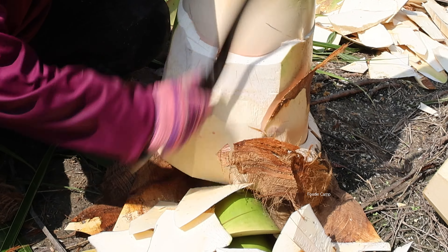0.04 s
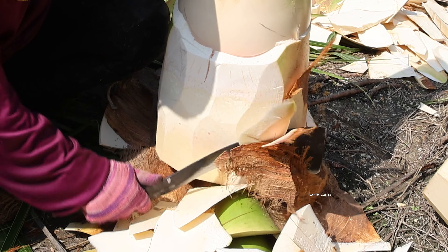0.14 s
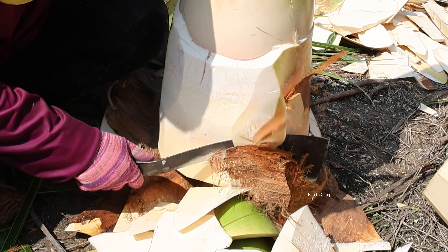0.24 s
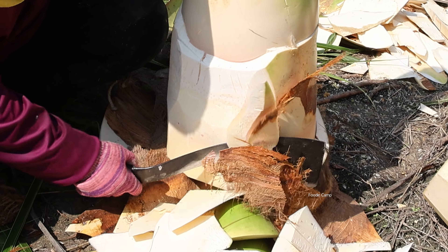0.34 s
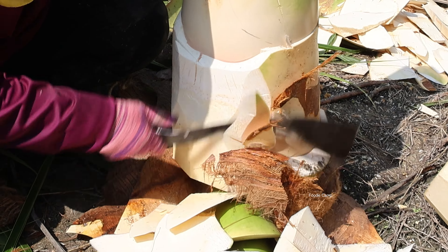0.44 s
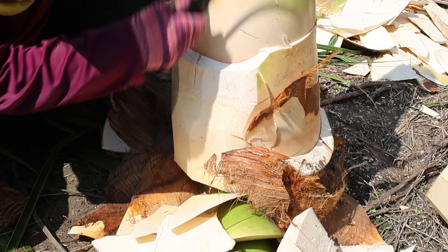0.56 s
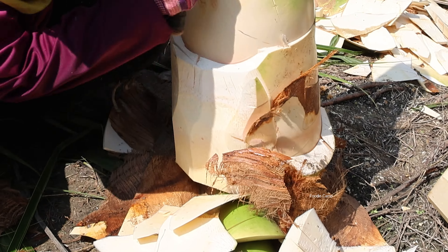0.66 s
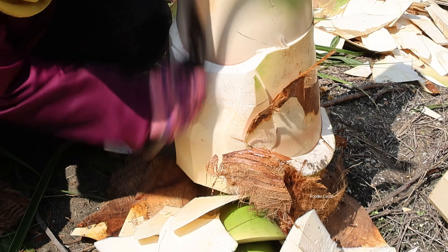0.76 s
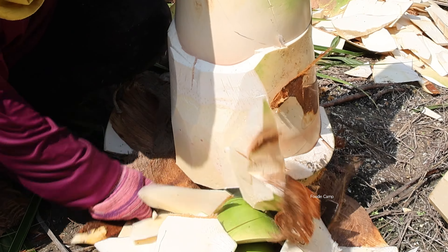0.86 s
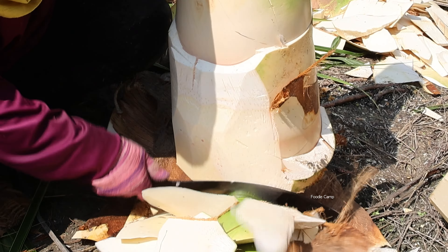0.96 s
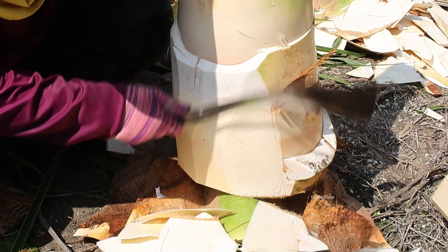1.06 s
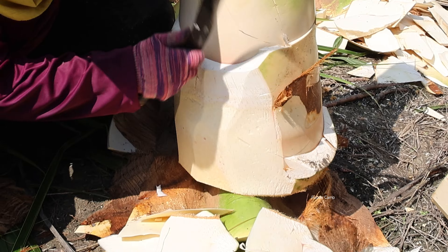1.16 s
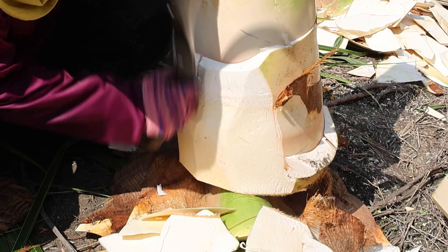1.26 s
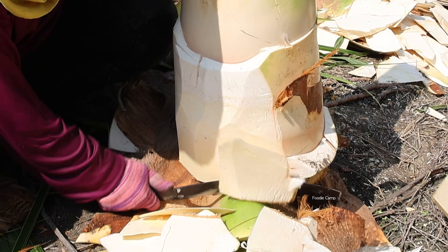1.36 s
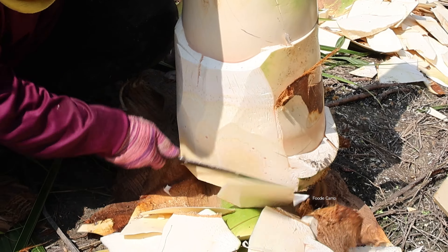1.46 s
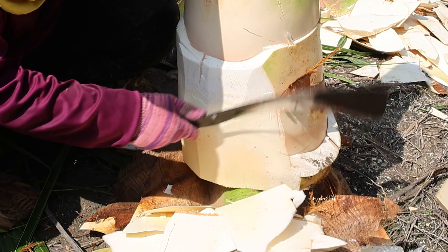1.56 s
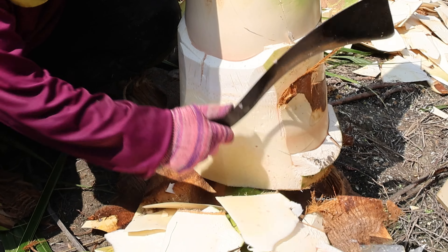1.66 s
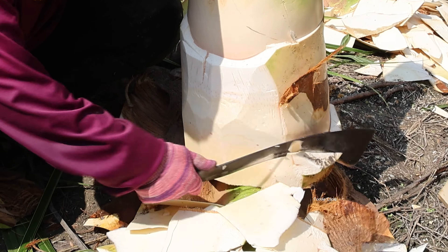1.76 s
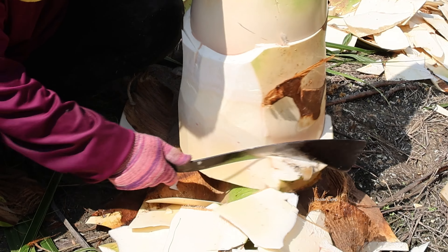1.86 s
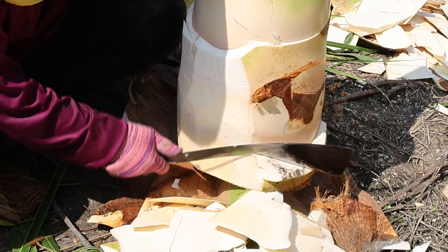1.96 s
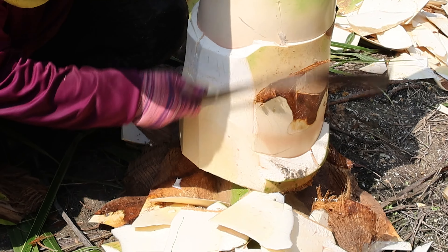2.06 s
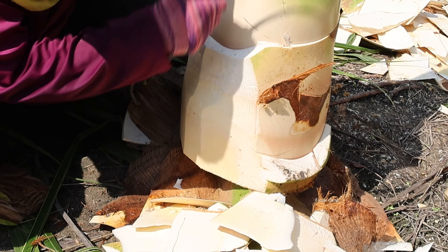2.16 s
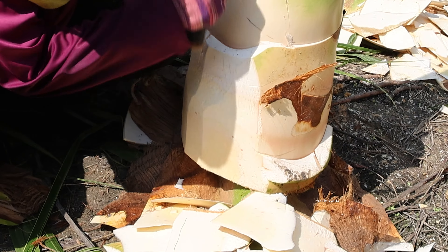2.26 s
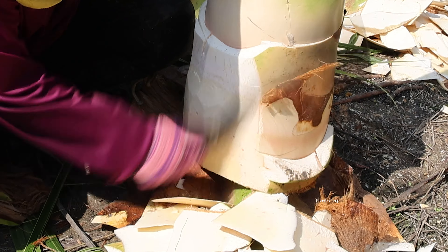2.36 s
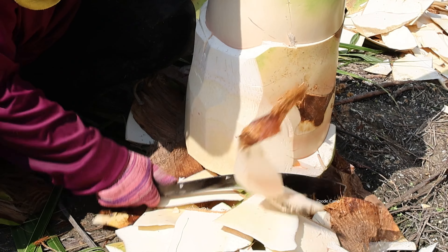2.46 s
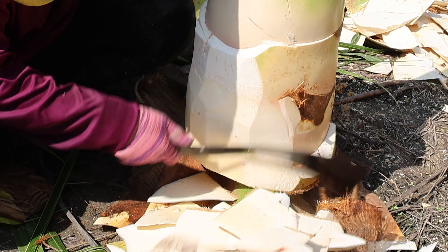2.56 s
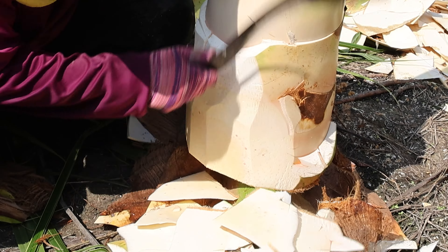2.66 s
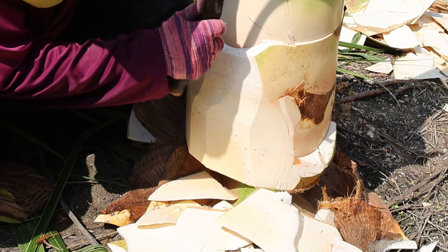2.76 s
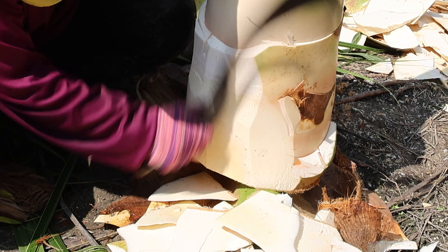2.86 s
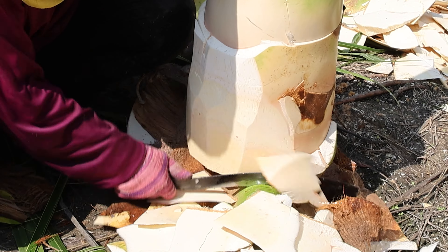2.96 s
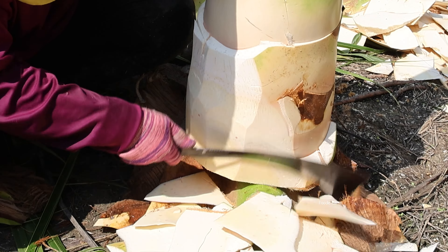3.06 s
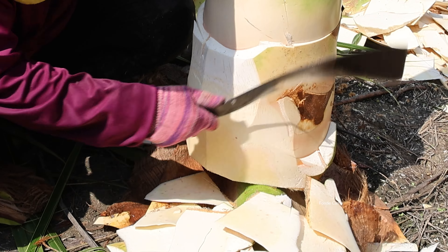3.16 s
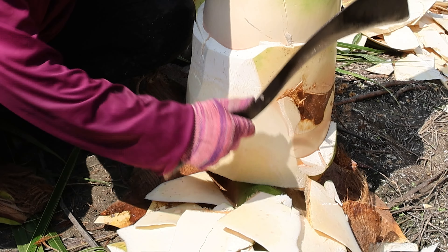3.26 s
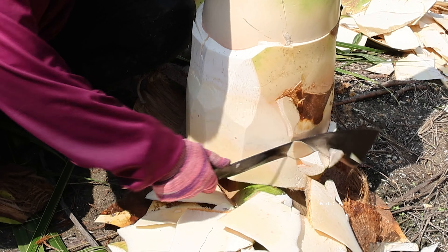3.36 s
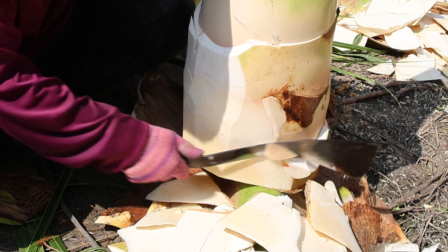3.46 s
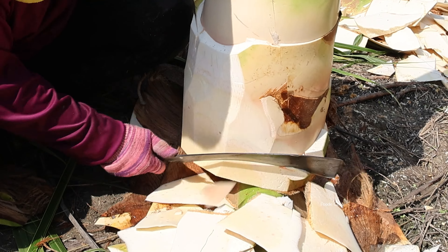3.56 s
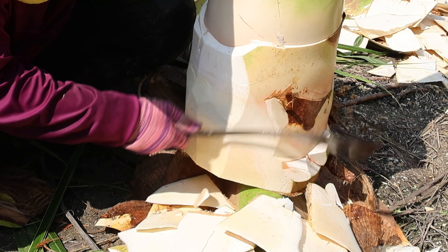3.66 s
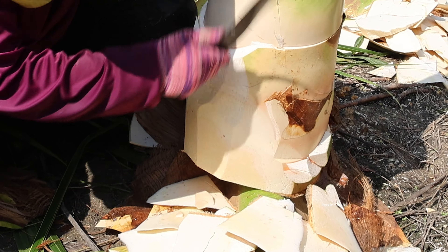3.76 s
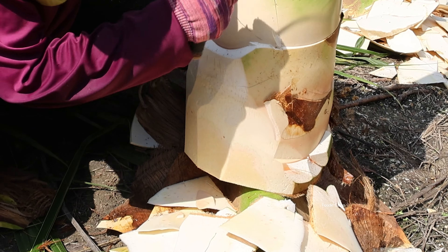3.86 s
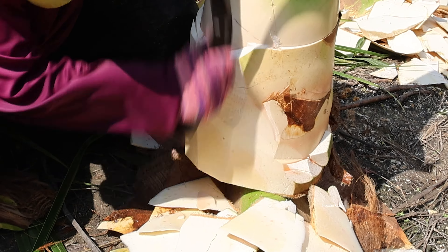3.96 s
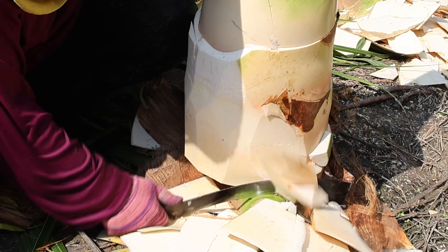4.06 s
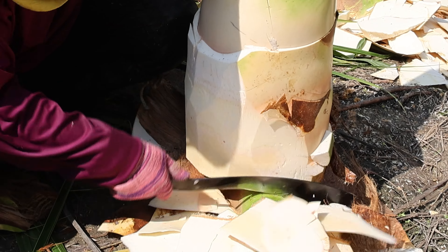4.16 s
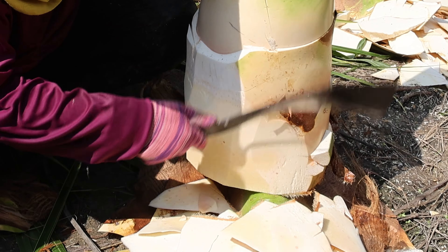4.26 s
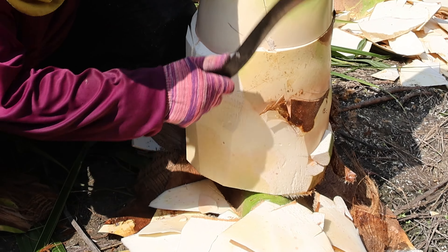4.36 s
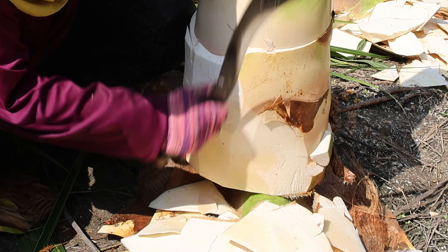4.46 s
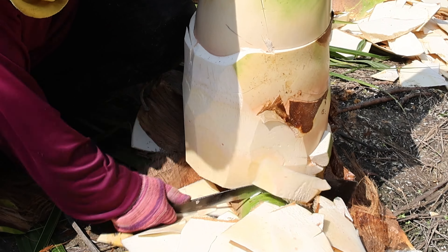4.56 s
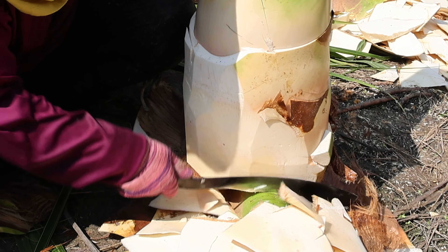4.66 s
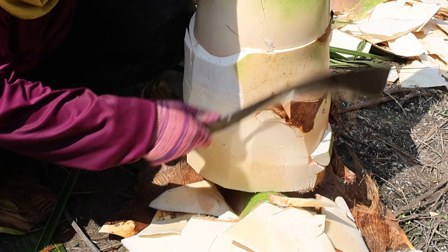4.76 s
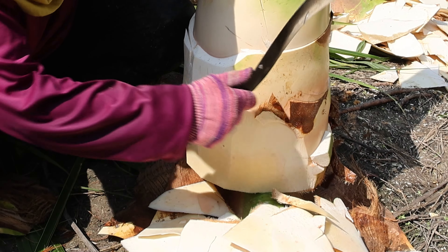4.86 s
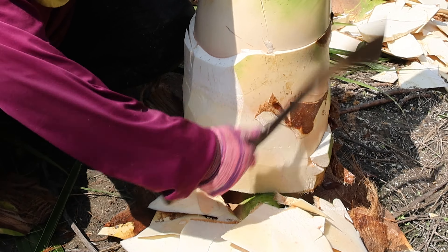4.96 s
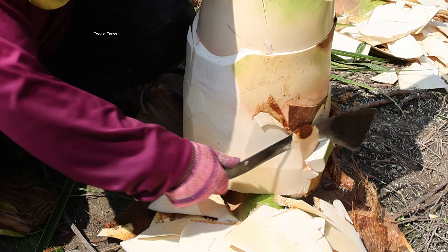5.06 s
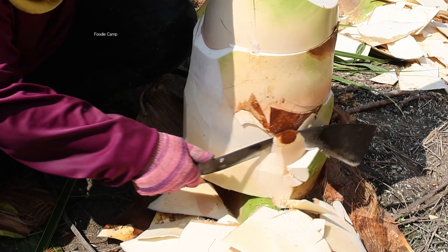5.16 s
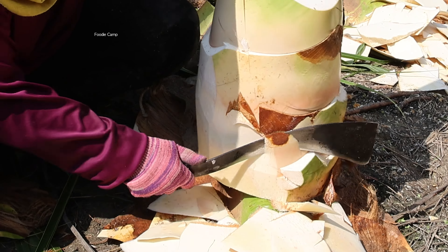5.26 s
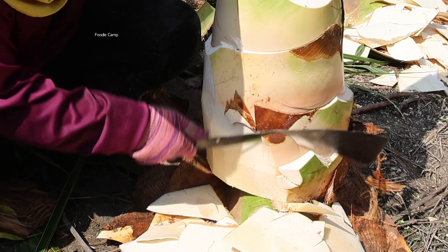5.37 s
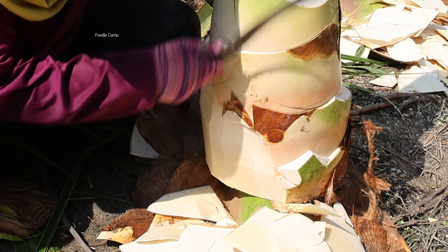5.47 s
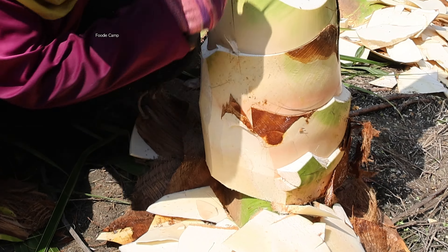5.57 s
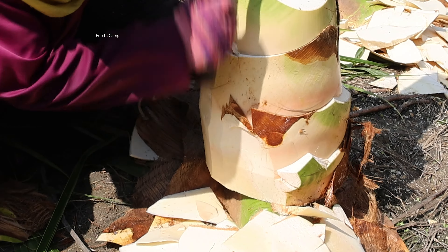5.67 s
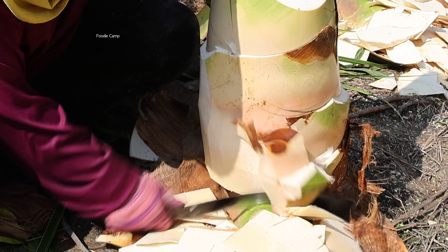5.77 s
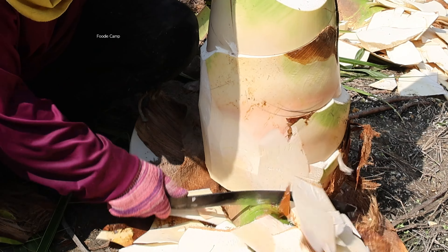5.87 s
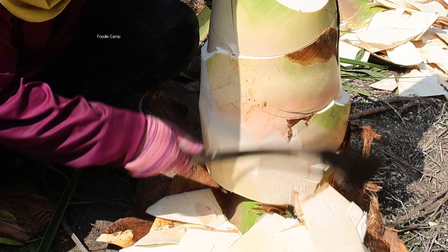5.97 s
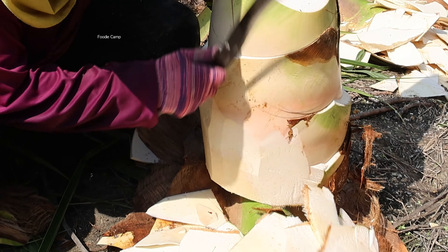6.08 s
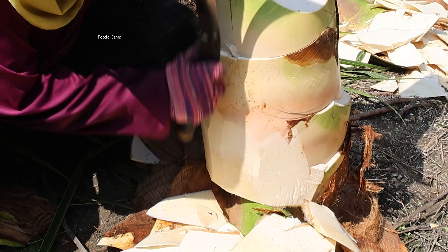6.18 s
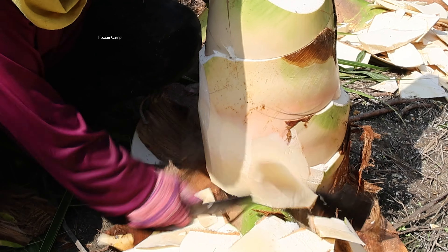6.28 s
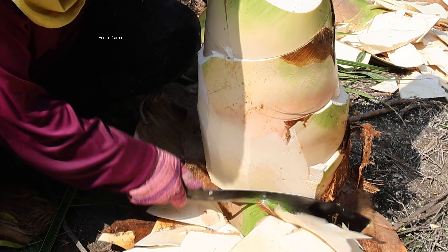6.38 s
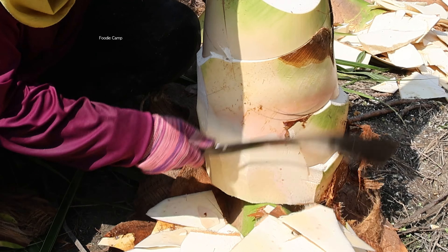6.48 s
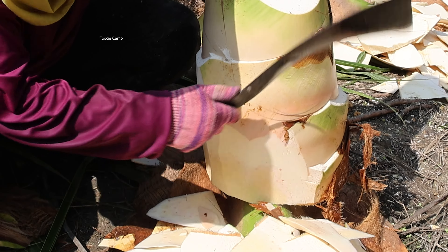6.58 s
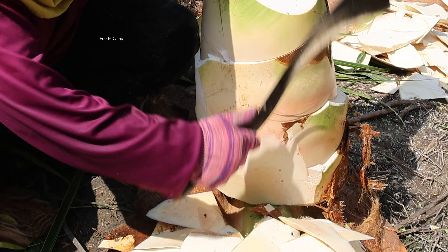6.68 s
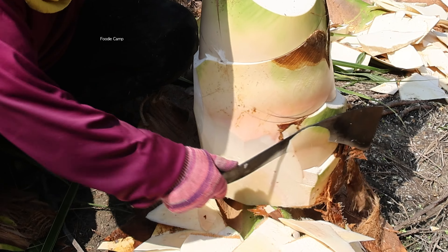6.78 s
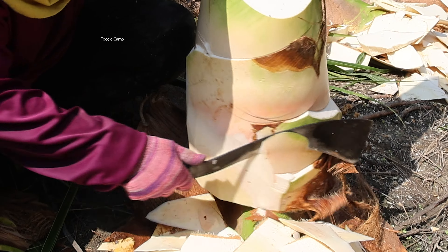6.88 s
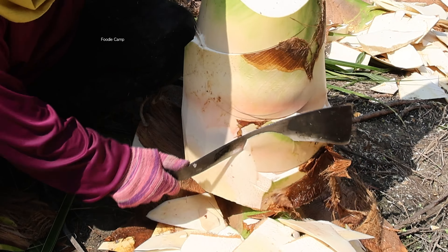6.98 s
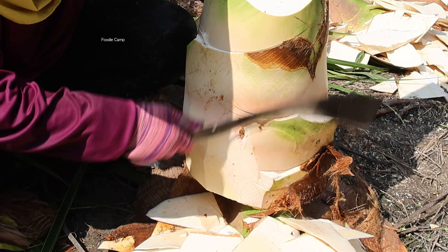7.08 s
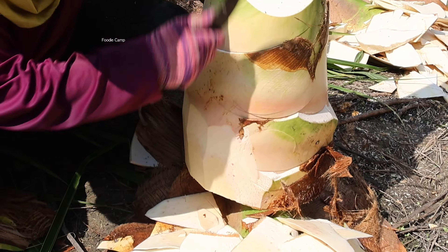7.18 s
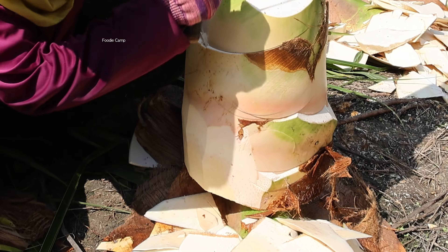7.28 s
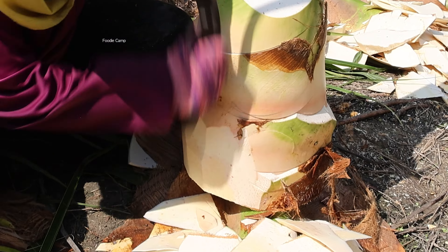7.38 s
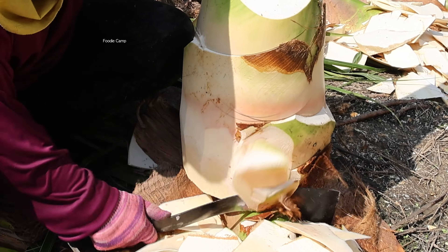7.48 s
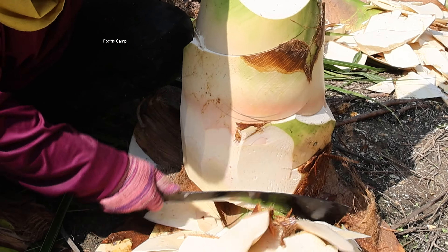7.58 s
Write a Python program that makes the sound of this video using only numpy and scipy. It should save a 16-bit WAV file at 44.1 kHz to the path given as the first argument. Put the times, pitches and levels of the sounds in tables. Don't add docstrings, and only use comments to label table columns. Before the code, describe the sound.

Outdoors, close and dry, a steel blade chops a damp, fibrous coconut trunk over a faint street hum and soft low wind. The first ripping chop lands at 0.2 seconds, then the blade drags free with gritty slips and squeaks from 0.55 to 0.85. Chops follow at 0.9, 1.4 and 1.85, each tearing crisply before a short hollow knock; thin steel grazes ring near 2.0. Husk groans upward and chips rattle quickly around 2.35, leading into a cut at 2.5. Another comes at 3.0, then one at 3.45 with a bright hard snap and brief metallic clang at 3.55. Strikes continue at 4.1, 4.65, a lighter one at 5.1 with slabs knocking at 5.3, then 5.85, 6.4, a softer one at 6.85, and a final sharp tear at 7.55. Scrapes, ticking chips and small creaks fill the gaps.

```python
import sys
import numpy as np
from scipy import signal
from scipy.fft import rfft, irfft, next_fast_len
from scipy.io import wavfile
from scipy.ndimage import uniform_filter1d, map_coordinates

SR = 44100
rng = np.random.default_rng(int(sys.argv[2]) if len(sys.argv) > 2 else 0)


def volts(x):
    e = np.asarray(x, float) / 20
    return 10 ** e


def waveform_to_disk(signal):
    frames = np.transpose(np.atleast_2d(signal))
    scaled = np.clip(frames, -1, 1) * 32767
    samples = np.round(scaled).astype(np.int16)
    wavfile.write(sys.argv[1], SR, samples)


N = 336469

# freq_hz, level_db
WIND_SPECTRUM = [(15, 1.5), (25, 5), (33, -0.5), (42, -0.5), (55, -34)]
# time_s, level_db
GUSTS = [(0.0, -38.5), (0.68, -31), (0.93, -41), (1.21, -31), (4.06, -38), (5.57, -33), (5.74, -39.5),
         (6.99, -28.5), (7.22, -32), (7.48, -26.5), (7.63, -50)]
# freq_hz, level_db
RUMBLE_SPECTRUM = [(35, -25), (50, -5.5), (70, -3.5), (110, -8), (160, -9), (260, -21)]
# freq_hz, level_db
STREET_SPECTRUM = [(88, -41), (150, -10.5), (280, 1.5), (504, 1.5), (770, 1), (1980, -10.5), (2500, -14),
                   (3250, -39), (5500, -120)]
# time_s, level_db
STIR_LEVEL = [(0, -50), (.38, -53.5), (.6, -48), (.9, -41.5), (1.2, -51.5), (2, -50), (2.5, -50.5),
              (2.85, -52), (3.6, -49.5), (3.95, -53), (4.95, -53), (5.35, -47), (5.7, -54), (6.2, -54),
              (6.5, -49), (6.72, -56), (7.04, -45), (7.3, -53)]
STREET_DB = 1.5
SHOVE_DB = -9

# freq_hz, level_db
SCRAPE_SPECTRUM = [(500, -7), (1100, 3), (1800, 0.5), (3000, 1.5), (4500, 1), (6500, -8.5), (9000, -13)]
# freq_hz, level_db
FIZZ_SPECTRUM = [(3500, -70), (5500, 7), (7500, 3.5), (11000, 4.5), (15800, 1), (16000, -50)]
# start_s, length_s, level_db, dryness_db
DRAG_EVENTS = [(0.072, 0.27, -52, -1), (0.585, 0.31, -39, -1), (0.606, 0.033, -47.5, 14.5),
               (1.08, 0.012, -41.5, 2), (1.552, 0.029, -46.5, -3), (1.98, 0.12, -47, -4.5),
               (2.347, 0.14, -36, -2), (2.58, 0.071, -43, -4), (3.053, 0.027, -39.5, -2),
               (3.112, 0.024, -45, 5), (3.29, 0.016, -46, -15), (3.385, 0.016, -46.5, -5),
               (3.714, 0.033, -41, 2.5), (3.958, 0.041, -51, -4), (4.355, 0.2, -50, -6),
               (4.71, 0.059, -51, -2.5), (5.19, 0.079, -50, -3), (5.451, 0.036, -40, -1),
               (5.543, 0.083, -50, -2), (6.266, 0.021, -41.5, 7), (6.473, 0.02, -42, 1),
               (6.988, 0.049, -48, 0), (7.14, .035, -56.5, 6), (7.626, .05, -37.5, 3)]
GRIP_DB_PER_S, RELEASE_DB_PER_S = 283, 229
SETTLE_DB, SETTLE_DB_PER_S, SETTLE_DRY_DB = -35, 91, -4
REST_DB, REST_DRY_DB, REST_FOLLOWS = -52, -3.5, 0.47

# start_s, length_s, pitch_hz, level_db
CREAK_EVENTS = [
    (.56, .1, 1980, -50),
    (.59, .08, 1620, -43),
    (.7, .12, 4100, -46),
    (2.179, 0.085, 780, -45.5),
    (2.265, 0.055, 1230, -47),
    (2.36, 0.11, 1600, -48),
    (2.4, 0.055, 2250, -40),
    (6.98, .085, 1000, -43),
    (7.015, .035, 2150, -48),
    (6.255, .04, 6400, -40),
]

BLADE_HZ = np.array([1295, 1610, 2640, 2902, 4535, 5975, 7650, 8290, 9243, 10840, 12460, 13980, 14990, 15710])
BLADE_T60 = [0.35, 0.17, 0.5, 0.37, 1, 0.17, 0.14, .22, .1, 0.077, 0.031, .04, .2, .04]
CLANG_DB = [-44, -70, -70, -44, -37, -35, -16.5, -70, -38, -30, -40, -40, -42, -45]
CLANG_S, CLANG_FREE_MS, BLADE_WAVER_DB = 3.55, 57, 1.5
# time_s, mode_hz, level_db, free_ms
GRAZE_EVENTS = [(.524, 2896, -43, 29), (0.552, 1610, -44, 30), (0.583, 2640, -36.5, 110),
                (.93, 4500, -54, 200), (1.105, 8300, -48, 90), (1.105, 10780, -38, 35),
                (1.573, 7650, -44, 60), (1.573, 10780, -36, 60), (1.988, 2896, -34, 230),
                (1.988, 8300, -51, 50), (1.986, 12460, -23, 50), (2.095, 9235, -32, 71),
                (2.103, 14010, -36, 30), (2.103, 15710, -42, 30), (3.68, 1310, -43, 56),
                (4.283, 2896, -45, 97), (4.655, 8300, -35, 90), (6.027, 2896, -50, 55),
                (6.252, 2640, -50, 30), (6.249, 2896, -45, 39), (4.775, 5975, -49, 18),
                (4.79, 4500, -56, 47), (6.279, 1610, -42, 30), (6.395, 4500, -49, 160)]

# time_s, peak_db, centre_hz
CHIPS = [(.2366, -23, 2600), (.519, -31, 2900), (2.565, -36, 11000), (2.575, -36, 4000),
         (2.7382, -25, 2280), (2.82, -35, 11500), (2.83, -41, 4200), (4.079, -28, 1300), (4.087, -23, 1800),
         (4.095, -29, 900), (4.2203, -28, 5700), (4.2415, -27, 4440), (4.272, -30, 8040),
         (4.4832, -29, 1900), (4.705, -30, 1500), (6.1265, -30, 3500), (6.134, -33, 4000),
         (6.557, -32, 1700), (1.097, -27, 3300), (1.135, -34, 4500), (7.02, -34, 4500), (7.591, -27, 5300),
         (2.3437, -29, 1200), (2.3652, -33, 1100), (2.3816, -27, 1100), (2.3966, -18, 1200),
         (2.4106, -17, 1900), (2.424, -20, 2190), (2.4355, -18, 2210), (2.448, -15, 2500)]
# time_s, peak_db, centre_hz
SLIP_EVENTS = [(0.5524, -9, 5700), (0.5828, -9.5, 5950), (0.6085, -9, 4450), (0.628, -10, 5900),
               (.646, -16, 5500), (.664, -17, 3000), (.6795, -20, 3460), (.697, -19, 3600),
               (0.7153, -11, 2740), (.73, -21, 4460), (.748, -21, 5200), (.828, -17, 5500),
               (.798, -17, 1800), (0.7951, -16, 8500), (0.8117, -13, 3160), (0.8485, -11, 4200),
               (.859, -20, 6000), (1.0945, -28, 1530), (1.574, -25, 10900), (2.0944, -20, 9240),
               (2.3057, -18, 5050), (2.3221, -16.5, 4290), (2.345, -13.5, 6400), (2.4471, -15, 6090),
               (3.7196, -14, 10100), (3.7364, -22, 8240), (5.2563, -18, 1100), (6.2775, -12, 11500),
               (6.3365, -29, 7960), (6.45, -22, 8000), (6.507, -22, 4500)]
# time_s, peak_db, centre_hz
SNAP_EVENTS = [(0.2134, -21, 4280), (0.4289, -23.5, 5340), (1.978, -10, 3250), (1.9864, -8.5, 2970),
               (2.7133, -20.5, 6000), (3.044, -27, 5690), (3.485, 2, 8500), (3.5105, 10, 7500),
               (3.5156, 4, 5500), (3.5235, 1, 4500), (3.5495, -4, 10000), (3.6072, -6.5, 2370),
               (3.6245, -6, 7000), (3.707, -17, 10500), (4.0851, -30, 10800), (4.7737, -20, 9000),
               (5.1542, -2.5, 8500), (5.1582, -1, 4280), (5.1815, -9, 10200), (5.2887, -12, 2700),
               (5.357, -17, 2920), (6.034, -31, 2870), (6.12, -31, 7000), (1.003, -24, 4000),
               (.1662, -5, 2500), (3.4895, -8, 5000), (6.2485, -2, 6400)]
# time_s, peak_db, centre_hz
CRACK_EVENTS = [(0.1745, 5, 6800), (0.1834, 4, 7150), (0.1904, -3, 3100), (0.2054, -8, 4330),
                (0.9043, -4, 3760), (0.9144, 4, 3300), (0.9224, 1, 3760), (1.4244, -1, 5830),
                (1.4334, -6, 4220), (1.8507, 11, 8830), (1.8544, 3, 3630), (2.4663, 2, 4180),
                (2.4854, -2, 4410), (2.4924, -2, 2720), (2.9991, 2, 4000), (3.0144, 0, 3560),
                (3.4506, 2, 3880), (3.4544, 3, 5770), (4.1175, 4, 4070), (4.1324, 4, 3870),
                (4.1374, 7, 2560), (4.6369, 5, 2700), (5.8406, 6, 2410), (5.8511, 2, 4000),
                (5.8604, -6, 2340), (6.3774, -3, 4580), (6.3884, 2, 7620), (6.8339, -7, 4140),
                (7.5368, -4, 4030), (7.5584, 1, 4040), (7.5714, -7, 4100)]

# pitch_hz, level_db, t60_s
CORE_MODES = [(235, -5.5, 0.14), (340, 8.5, 0.032), (417, -7.5, 0.031), (503, 0, 0.058), (557, -8, 0.038),
              (612, -7.5, 0.035), (725, 2, 0.031), (860, 4, 0.011), (1170, -5.5, 0.023), (1600, -13, 0.033)]
# time_s, peak_db, off_centre_db
DROP_EVENTS = [(1.068, -12.5, -23), (1.094, -27, -6), (1.988, -26.5, 0), (2.55, -32, -7), (2.566, -34, -2),
               (3.117, -22, -22), (3.55, -20, -4), (3.606, -32, -1), (3.619, -25, -11), (4.084, -33, -3),
               (4.22, -32, -8), (4.256, -33.5, -5), (4.774, -14, -14), (4.906, -29, -7), (5.2885, -3, -18),
               (5.975, -30.5, -11), (6.036, -29, -3), (6.338, -30, -6), (6.349, -28.5, -1),
               (6.45, -23, -10), (6.479, -26, -5), (6.507, -24, -15), (1.02, -32, -6), (1.032, -33, -10),
               (1.0705, -19, -15), (1.101, -18, -8), (3.626, -28, -4), (4.706, -33, -8), (4.727, -34, -8),
               (4.777, -15, -18), (4.792, -32, -5), (5.2915, -5, -20), (6.5095, -19, -8), (7.034, -33, -8)]
# time_s, peak_db, off_centre_db
JOLT_EVENTS = [(0.166, -20, 9), (.172, -19, 4.5), (.898, -12.5, 5.5), (0.924, 1.5, -20), (1.409, -15.5, -4),
               (1.419, -9.5, -9), (1.442, 1, -30), (1.841, -28, 7), (1.848, -16.5, 7.5), (1.863, -21.5, -1),
               (2.465, -20, -6), (2.502, -5, -12), (2.5082, -9, -22), (2.987, -20, -2), (3.011, -14, -13),
               (3.015, -2.5, -23), (3.026, -14, -7), (3.447, -17, 5), (3.464, -19.5, 0), (4.116, -25, 12),
               (4.149, -7.5, -19), (4.635, -26, 6), (4.649, -1.5, -17.5), (4.656, -6.5, -12),
               (5.084, -18.5, -0.5), (5.101, -17.5, -2), (5.84, -12.5, -5), (5.87, -2.5, -14),
               (6.361, -24, 8), (6.389, 0.5, -20), (6.839, -15.5, -0.5), (6.848, -16, -2),
               (6.861, -32.5, 13), (7.57, -22, -14)]
HIGH_DB, HIGH_FOLLOWS = 2.5, 0.41
FREE_S = (.925, 1.442, 4.649)
HELD_RING = .72

# freq_hz, level_db
FIBRE_SPECTRUM = [(120, -1), (200, -13), (1500, -3), (2750, -1), (4860, -1.5), (9000, -1), (14100, -7),
                  (16000, -6)]
# time_s, rise_ms, tearing_ms, level_db, tilt_db_per_octave
BITE_EVENTS = [(0.165, 7, 12.5, -7, 4), (.893, 12.4, 10, -5.5, -1), (1.408, 14, 10.4, -5, 3.5),
               (1.85, 1.2, 4.6, -8.5, 2), (2.4646, 1.5, 6.7, -7, -1), (2.986, 16.7, 4, -5, 3),
               (3.446, 5.4, 5.4, -8, 3), (4.113, 4.6, 1.8, -3, 7.5), (4.637, .6, 3.3, -6, -4),
               (5.0837, .6, 5.3, -14, 9), (5.8411, 0.46, 3.7, -3.5, -1), (6.36, 5.6, 15, -10.5, 5),
               (6.8313, .5, 13, -14.5, 4), (7.535, 2.2, 1.6, -1, -1)]
# time_s, tearing_ms, level_db, tilt_db_per_octave, slit_hz
LAYER_EVENTS = [(0.165, 12, -15.5, -1, 1490), (0.184, 8, -15.5, 3.5, 2700), (.196, 9, -22.5, 0, 3300),
                (.205, 6.3, -18.5, 2, 3860), (0.917, 6.6, -16, -3, 3500), (.922, 7, -14, -7, 2520),
                (1.431, 5.2, -14.5, -2, 4050), (1.434, 6, -19, 0, 3000), (1.441, 4, -15, -1, 3200),
                (1.840, 11, -25, 10, 7000), (1.86, 15, -38, -10, 3000), (2.472, 9, -9, 4, 5570),
                (2.482, 8, -10.5, 0.5, 4000), (2.493, 5.3, -13, -4, 3180), (2.501, 6.7, -19.5, -5, 2980),
                (3.005, 6.3, -18.5, -4, 3140), (3.011, 4.1, -14, -1, 2540), (3.017, 7.6, -24.5, -4, 3530),
                (3.441, 5, -30, -3, 4000), (3.606, 20, -30, -3.5, 2420), (4.121, 10.6, -9, 0.5, 4300),
                (4.13, 9.3, -10, -1.5, 3460), (4.137, 3.4, -9, -5.5, 2580), (4.144, 8, -19.5, -4, 2800),
                (4.635, 4, -20, 8, 9000), (4.642, 9.8, -8.5, 7.5, 6160), (4.654, 5, -27, -11, 3000),
                (5.091, 9.8, -12.5, 4.5, 6260), (5.838, 3, -23, 0, 4500), (5.846, 5.1, -11, 3, 2500),
                (5.852, 2.5, -7, 0, 4100), (5.855, 8.4, -10, -4.5, 3350), (5.865, 5.2, -19, -8, 2500),
                (5.871, 5.7, -23.5, -5, 3160), (6.376, 8.7, -7, -3.5, 7150), (6.389, 3.3, -13.5, 6, 4020),
                (7.541, 14, -10.5, 0, 3800), (7.556, 7.1, -9.5, -3, 3270), (7.565, 3.6, -19, -5, 2300),
                (7.57, 2.5, -18, -8.5, 4030)]
LAYER_RISE_MS, FIRST_TOUCH_DB = 0.76, -21
SLIT_HZ, SLIT_SAG_OCT = 4100, 0.17


def unit(x):
    return x / np.sqrt(np.mean(x ** 2) + 1e-20)


def along(points, hz):
    f, db = np.transpose(points)
    return np.interp(np.log(hz + 1), np.log(f + 1), db, left=-120, right=-120)


def curve(rows):
    s, level = np.transpose(rows)
    return np.interp(np.arange(N) / SR, s, level)


def wobble(rate, size=N):
    knots = rng.standard_normal(int(size * 4000 / SR) + 4)
    return map_coordinates(knots, [np.arange(size) * min(rate, 3999) / SR])


def coloured(x, gain):
    m = next_fast_len(len(x))
    spectrum = rfft(x, m) * gain(np.fft.rfftfreq(m, 1 / SR))
    return unit(irfft(spectrum, m)[:len(x)])


def crackle(spiky_db, clump_db, rate, size=N):
    sizes_db = spiky_db * rng.exponential(size=size) + clump_db * wobble(rate, size=size)
    return rng.standard_normal(size) * volts(sizes_db)


def patchy(x, depth_db):
    z = signal.stft(x, nperseg=256)[2]
    field = uniform_filter1d(rng.standard_normal(z.shape), size=3, axis=0)
    field = uniform_filter1d(field, size=5, axis=1)
    return signal.istft(z * volts(depth_db * unit(field)), nperseg=256)[1][:len(x)]


def add(out, s, x):
    out[round(s * SR):][:len(x)] += x


def bursts(rows, attack, t60, octaves, tail_db, skirt):
    out, t = np.zeros(N + SR), np.arange(4096) / SR
    decay = volts(-60 * t / t60) + volts(tail_db - 60 * t / 0.1)
    shape = (1 - np.exp(-t / attack)) * decay

    def gain(f):
        hump = np.exp(-.5 * (np.log2(f / hz + 1e-3) / octaves) ** 2)
        return (hump + skirt * (f > 500)) * (f < 15900)

    for s, db, hz in rows:
        grains = crackle(spiky_db=-2.5, clump_db=-3.0, rate=380, size=len(t))
        add(out, s - attack, volts(db) * shape * coloured(grains, gain))
    return out[:N]


def air(scrape_db):
    def noise(points):
        return coloured(rng.standard_normal(N), lambda f: volts(along(points, f)))

    wind = noise(WIND_SPECTRUM)
    wind = unit(wind / (uniform_filter1d(np.abs(wind), size=3500) + .05) ** .15)
    hum_level = np.hypot(volts(curve(STIR_LEVEL) + STREET_DB), volts(scrape_db + SHOVE_DB))
    street = hum_level * volts(2.3 * wobble(15)) * noise(STREET_SPECTRUM)
    traffic = volts(-51.0 + 1.16 * wobble(4.67)) * noise(RUMBLE_SPECTRUM)
    return volts(curve(GUSTS) - 7.0) * wind + street + traffic


def rubbing():
    t, stir_db = np.arange(N) / SR, curve(STIR_LEVEL)
    rest = volts(REST_DB + REST_FOLLOWS * (stir_db - stir_db.mean())) ** 2
    power = rest * volts([[0], [REST_DRY_DB]]) ** 2
    moves = [(s, s + length, db, dry_db, RELEASE_DB_PER_S) for s, length, db, dry_db in DRAG_EVENTS]
    moves += [(s + 0.035, s + 0.023, db + SETTLE_DB, SETTLE_DRY_DB, SETTLE_DB_PER_S)
              for s, _, _, db, _ in BITE_EVENTS]
    for start, end, db, dry_db, release in moves:
        near = slice(max(round((start - .5) * SR), 0), round((end + 1) * SR))
        grip_db = GRIP_DB_PER_S * np.maximum(start - t[near], 0)
        release_db = release * np.maximum(t[near] - end, 0)
        power[:, near] += volts(db - grip_db - release_db + [[0], [dry_db]]) ** 2
    return 10 * np.log10(power)


def rustle(scrape_db, fizz_db):
    effort = np.clip((scrape_db + 59.0) / 14, 0, 1)
    catches = (rng.random(N) < 170 / SR) * np.minimum(rng.exponential(size=N), 2)
    fade = volts(-60 * np.arange(900) / SR / 0.0026)
    grip = 1 + .7 * effort * signal.fftconvolve(catches, fade)[:N]
    grip = grip * volts(effort * wobble(200))

    def rub(points):
        grains = patchy(crackle(spiky_db=1.5, clump_db=.7, rate=220), depth_db=1.5)
        return coloured(grains, lambda f: volts(along(points, f)))

    return grip * (volts(scrape_db) * rub(SCRAPE_SPECTRUM) + volts(fizz_db) * rub(FIZZ_SPECTRUM))


def creaks():
    out = np.zeros(N + SR)
    for s, length, hz, db in CREAK_EVENTS:
        width_hz = 0.043 * hz
        noise = coloured(rng.standard_normal(8192), lambda f: 1 / (1 + ((f - hz) / width_hz) ** 2))
        size = round(length * SR)
        add(out, s, volts(db) * np.sqrt(np.hanning(size)) * noise[:size])
    return out[:N]


def blade():
    out, t = np.zeros(N + SR), np.arange(SR // 4) / SR
    clang = [(CLANG_S, hz, db, CLANG_FREE_MS) for hz, db in zip(BLADE_HZ, CLANG_DB)]
    for s, hz, db, free_ms in GRAZE_EVENTS + clang:
        mode = np.abs(np.subtract(BLADE_HZ, hz)).argmin()
        touch = volts(-60 * np.maximum(t - free_ms / 1e3, 0) / .012)
        ring = (1 - np.exp(-t / 0.00067)) * np.sin(2 * np.pi * BLADE_HZ[mode] * t)
        waver = volts(BLADE_WAVER_DB * wobble(51, size=len(t)))
        add(out, s, volts(db - 60 * t / BLADE_T60[mode]) * touch * ring * waver)
    return out[:N]


def snaps():
    sharp = bursts(SNAP_EVENTS, attack=0.00015, t60=0.009, octaves=.95, tail_db=-19, skirt=.07)
    slips = bursts(SLIP_EVENTS, attack=0.00122, t60=.034, octaves=0.75, tail_db=-18, skirt=.07)
    cracks = bursts(CRACK_EVENTS, attack=.0003, t60=.008, octaves=.4, tail_db=-40, skirt=.15)
    chips = bursts(CHIPS, attack=.001, t60=.02, octaves=.3, tail_db=-25, skirt=.03)
    return volts(-11.5) * sharp + volts(-10.5) * slips + volts(-4) * chips + volts(-11) * cracks


def knocks():
    out, t = np.zeros(N + SR), np.arange(6000) / SR
    hz, level_db, t60 = np.transpose(CORE_MODES)[:, :, None]

    def soft(f):
        return f / (f + 350) / (1 + (f / 1250) ** 3)

    for s, db, low_db in JOLT_EVENTS + DROP_EVENTS:
        rings_out = np.abs(np.subtract(FREE_S, s)).min() < .003
        free = 1 if rings_out else HELD_RING
        high_db = HIGH_DB + HIGH_FOLLOWS * low_db
        side_db = np.where(hz < 400, low_db, np.where(hz > 620, high_db, 0))
        spot_level, spot_pitch = rng.standard_normal((2, len(CORE_MODES), 1))
        phase = 2 * np.pi * hz * (1 + 0.02 * spot_pitch) * t
        decay = volts(level_db + side_db + 1.5 * spot_level - 60 * t / (free * t60))
        ring = decay * np.sin(phase) * (1 - np.exp(-t * hz / .9))
        puff = volts(high_db - 1.5 - 60 * t / 0.03) * coloured(rng.standard_normal(len(t)), soft)
        push = volts(1.8 * wobble(116, size=len(t)))
        add(out, s - .001, volts(db - 3.0) * push * (ring.sum(0) + puff))
    return out[:N]


def tears():
    out, ms = np.zeros(N + SR), np.arange(4096) * 1000 / SR
    rows = [(*row, SLIT_HZ) for row in BITE_EVENTS]
    rows += [(s, LAYER_RISE_MS, *rest) for s, *rest in LAYER_EVENTS]
    for s, rise, hold, db, tilt_db, slit_hz in rows:
        def through_slit(octaves):
            hz = slit_hz * 2 ** octaves

            def gain(f):
                slit = 1 + 1.9 / (1 + ((f - hz) / (.12 * hz)) ** 2)
                return volts(along(FIBRE_SPECTRUM, f) + tilt_db * np.log2(f / 4000 + 0.67)) * slit

            return coloured(fibres, gain)

        fibres = patchy(crackle(spiky_db=2.5, clump_db=2.2, rate=600, size=len(ms)), depth_db=1.5)
        depth = np.clip(ms / (rise + hold), 0, 1)
        open_cut, deep_cut = through_slit(.5 * SLIT_SAG_OCT), through_slit(-.5 * SLIT_SAG_OCT)
        swell = volts(FIRST_TOUCH_DB * np.maximum(1 - ms / max(rise, .3), 0)) * (1 - np.exp(-ms / 0.49))
        after = np.maximum(ms - rise - hold, 0)
        stop = volts(-60 * after / 14) + volts(-25.5 - 60 * after / 150)
        stop = stop * np.cos(np.pi / 2 * ms / ms[-1])
        add(out, s, volts(db) * swell * stop * ((1 - depth) * open_cut + depth * deep_cut))
    return out[:N]


def scene():
    rub_db = rubbing()
    thin = signal.butter(4, 220, "high", fs=SR, output="sos")
    chops = signal.sosfilt(thin, tears() + knocks() + snaps())
    return (chops + blade() + creaks() + rustle(*rub_db) + air(rub_db[0]))[None]


def band_limit(x):
    return signal.sosfilt(signal.butter(12, 16390, fs=SR, output="sos"), x)


def record(dry):
    top = .95
    held = dry / (1 + np.abs(dry / top) ** 6) ** (1 / 6)
    dull = signal.cheby2(10, 50, 16450, fs=SR, output="sos")
    return band_limit(signal.sosfilt(dull, held))


dry = scene()
out = record(dry)
waveform_to_disk(out)
```